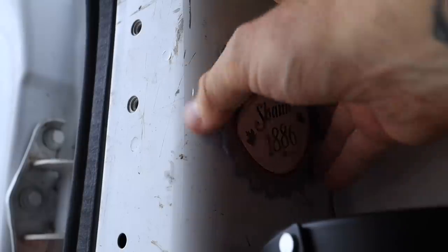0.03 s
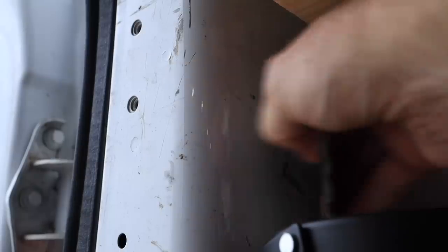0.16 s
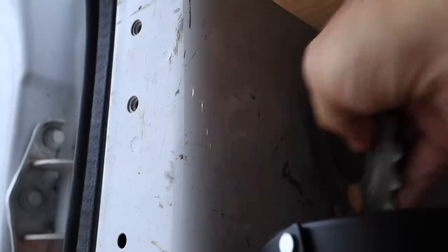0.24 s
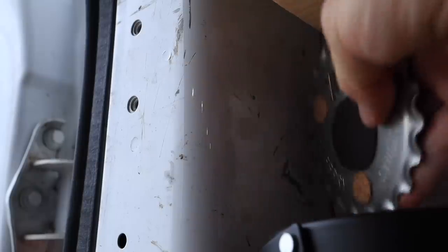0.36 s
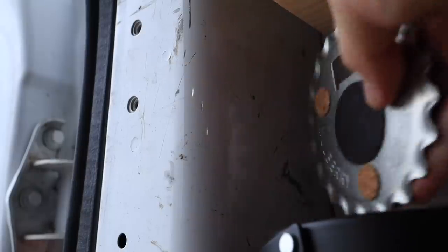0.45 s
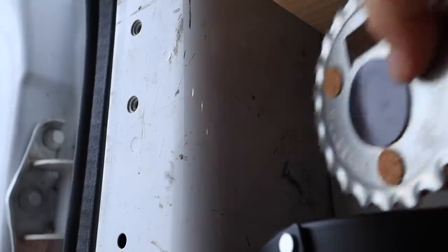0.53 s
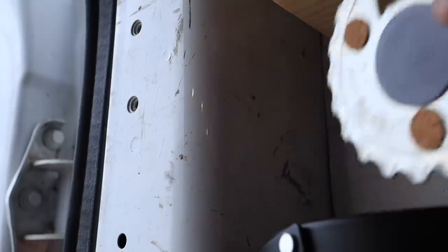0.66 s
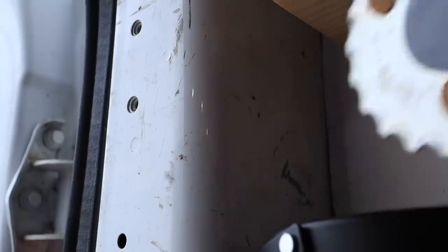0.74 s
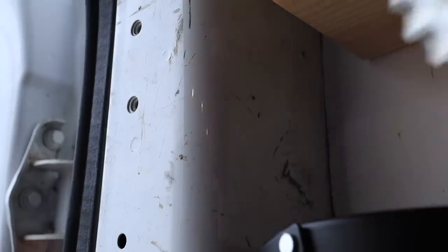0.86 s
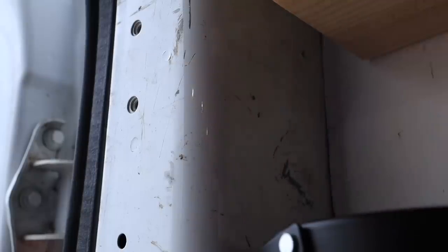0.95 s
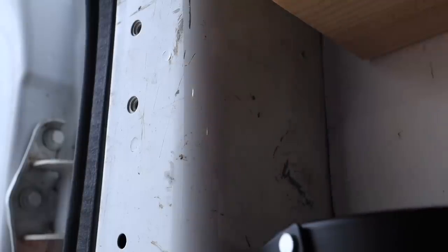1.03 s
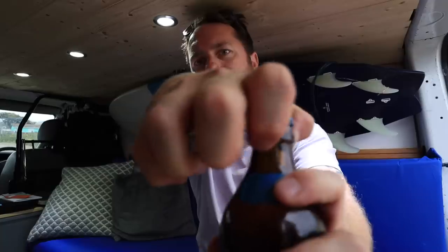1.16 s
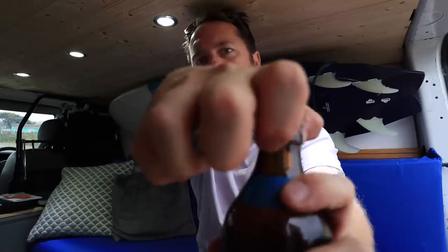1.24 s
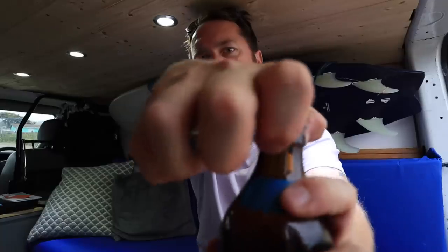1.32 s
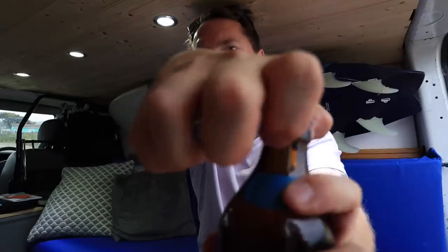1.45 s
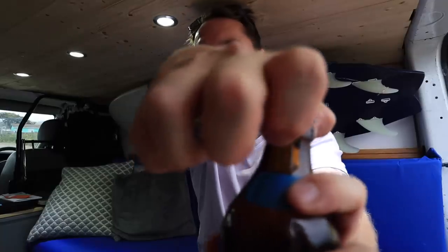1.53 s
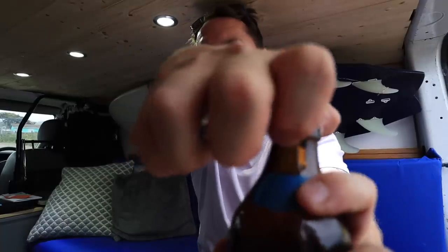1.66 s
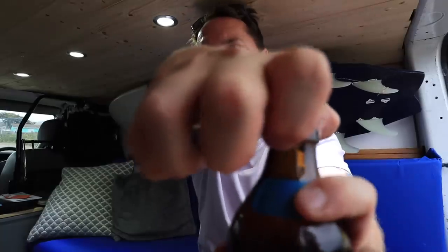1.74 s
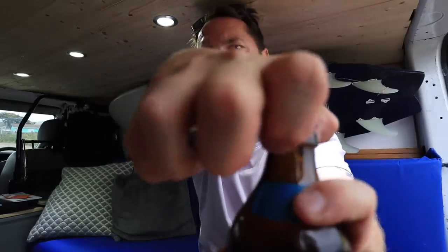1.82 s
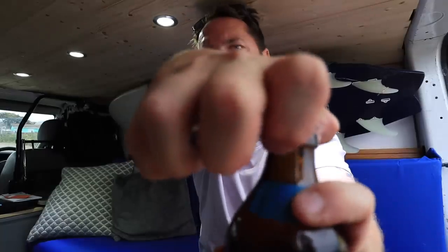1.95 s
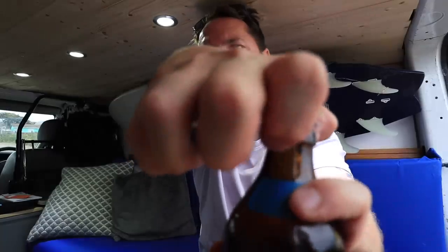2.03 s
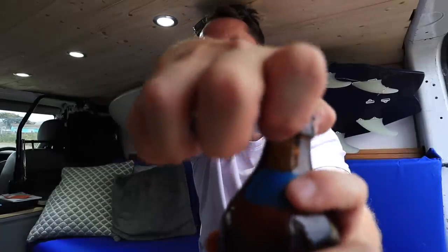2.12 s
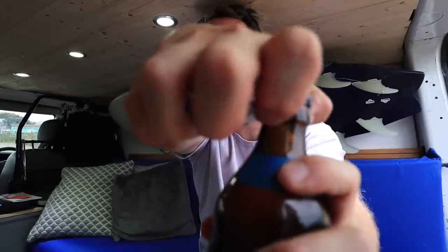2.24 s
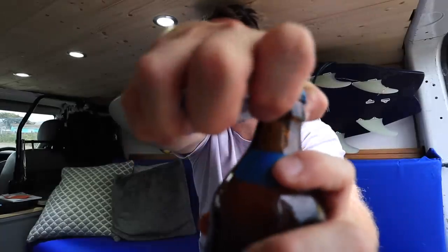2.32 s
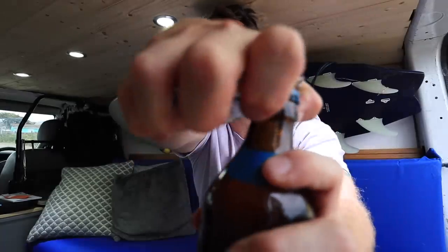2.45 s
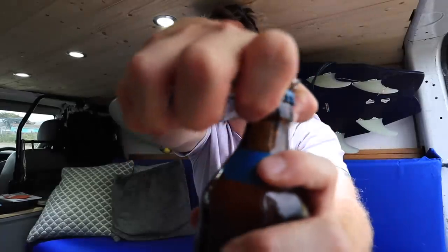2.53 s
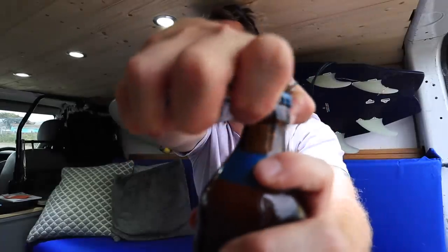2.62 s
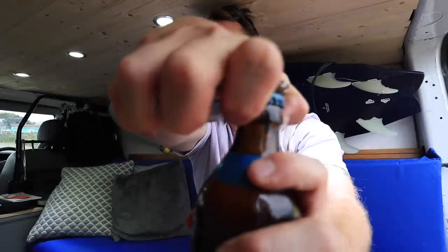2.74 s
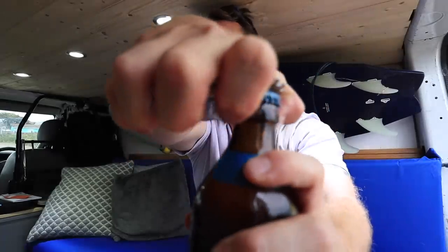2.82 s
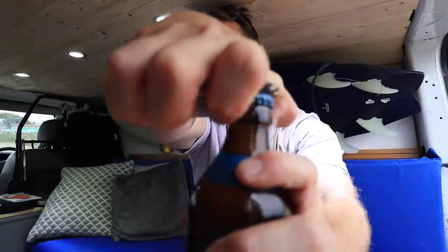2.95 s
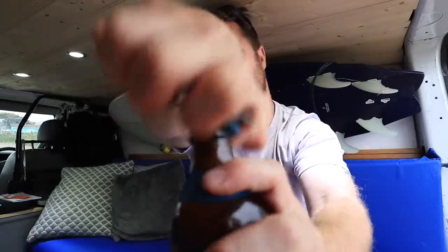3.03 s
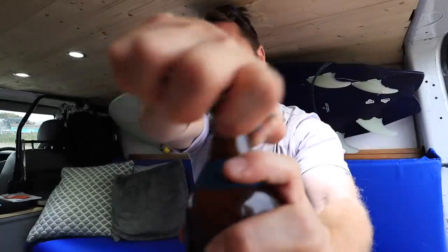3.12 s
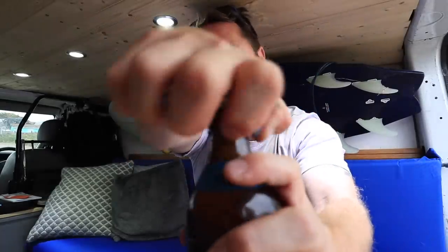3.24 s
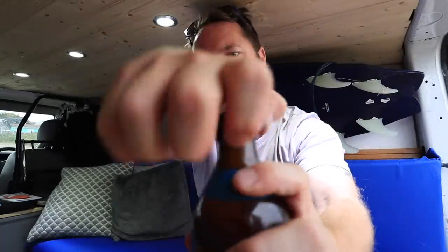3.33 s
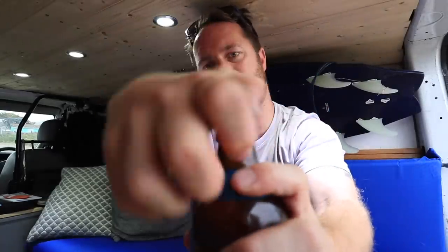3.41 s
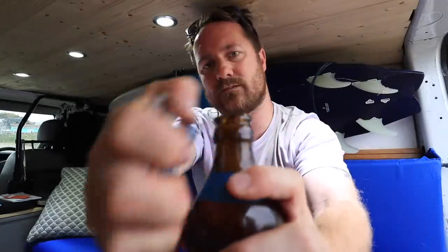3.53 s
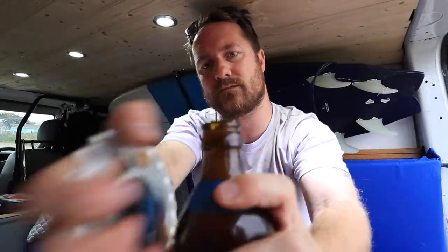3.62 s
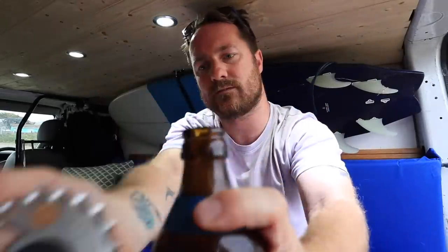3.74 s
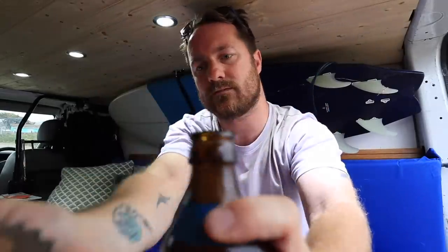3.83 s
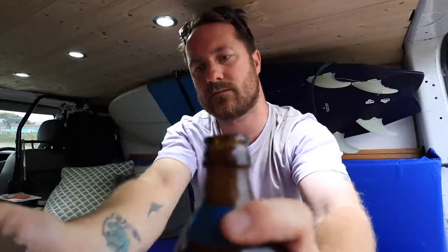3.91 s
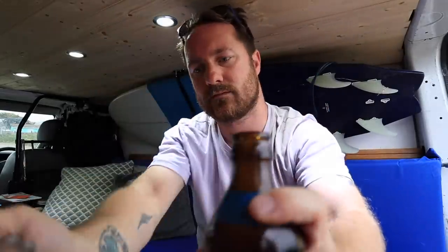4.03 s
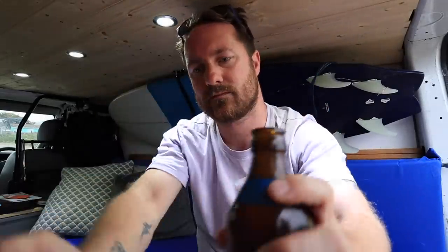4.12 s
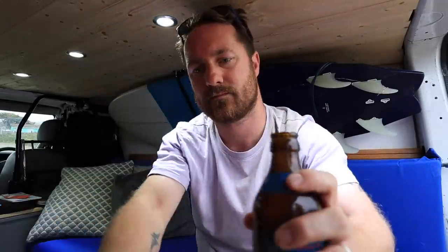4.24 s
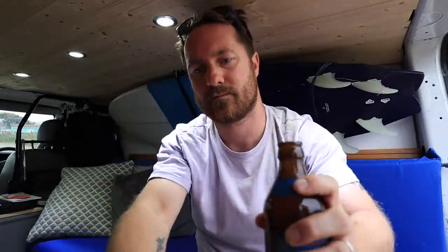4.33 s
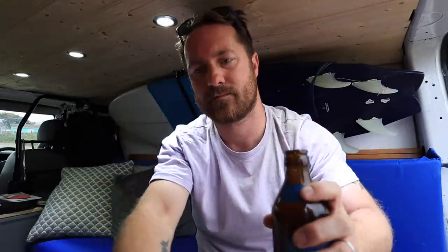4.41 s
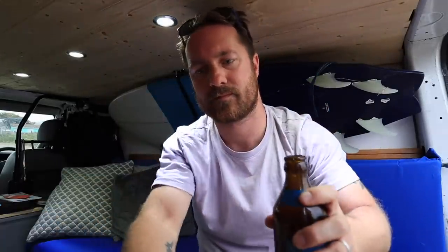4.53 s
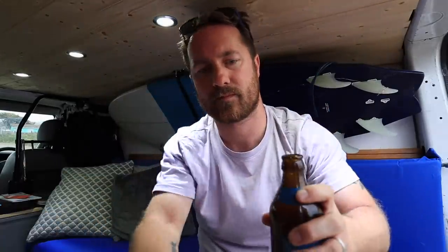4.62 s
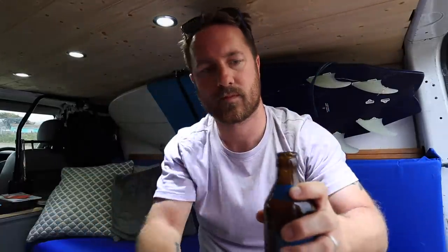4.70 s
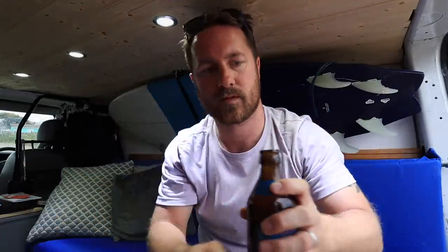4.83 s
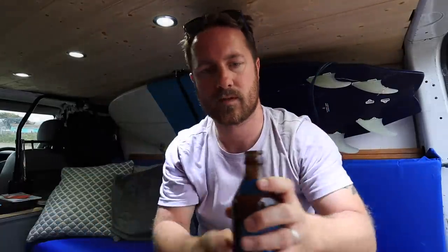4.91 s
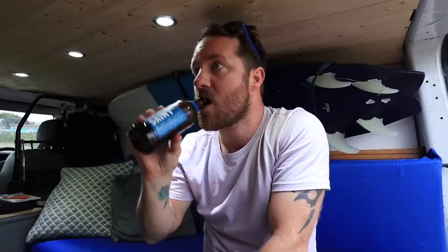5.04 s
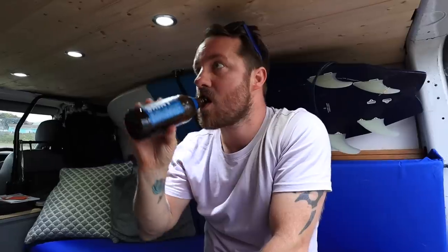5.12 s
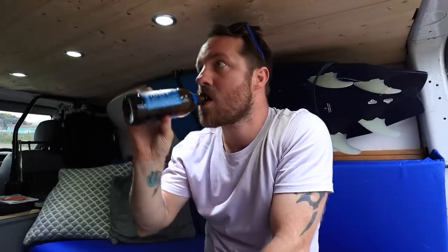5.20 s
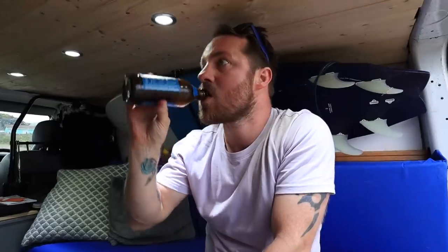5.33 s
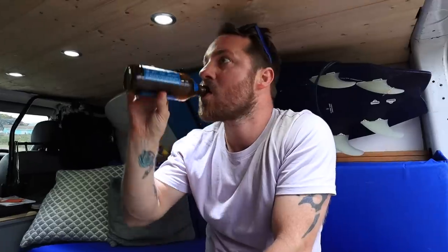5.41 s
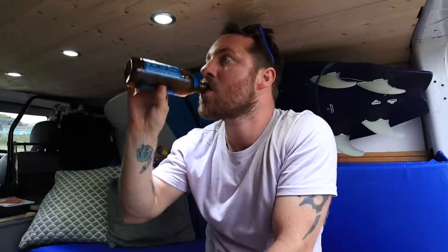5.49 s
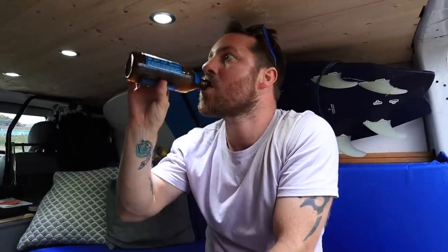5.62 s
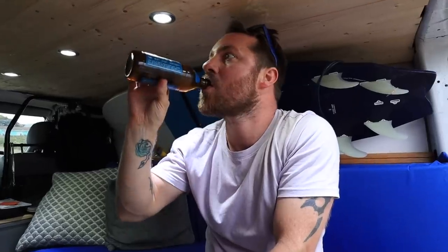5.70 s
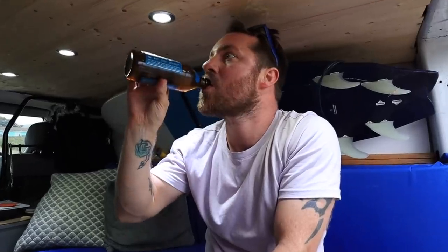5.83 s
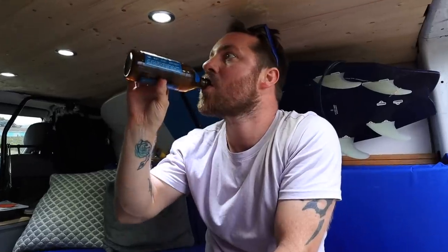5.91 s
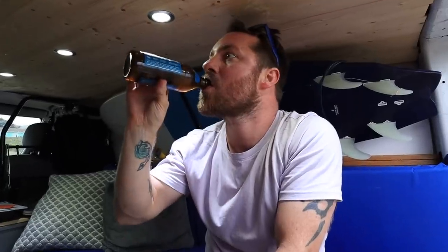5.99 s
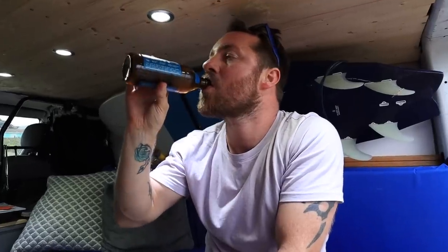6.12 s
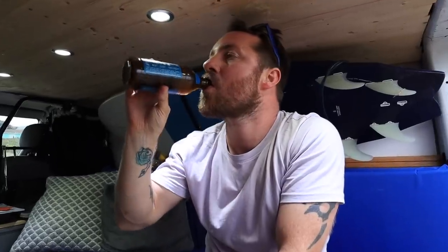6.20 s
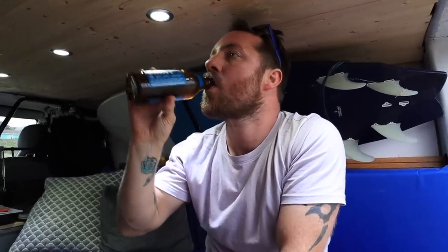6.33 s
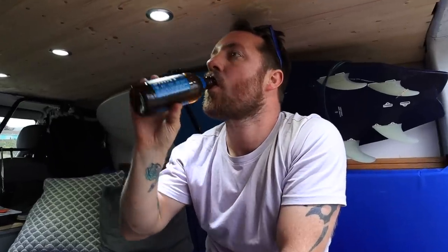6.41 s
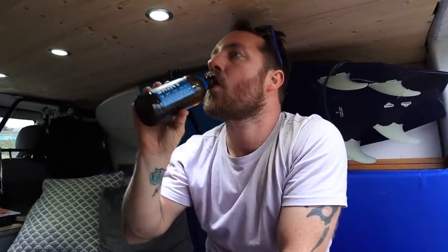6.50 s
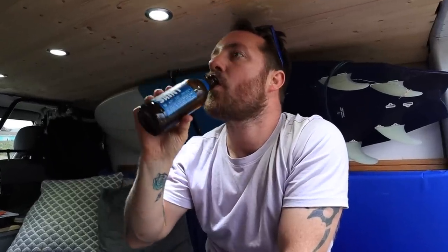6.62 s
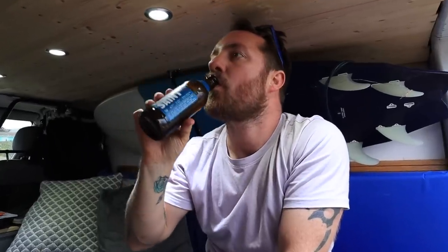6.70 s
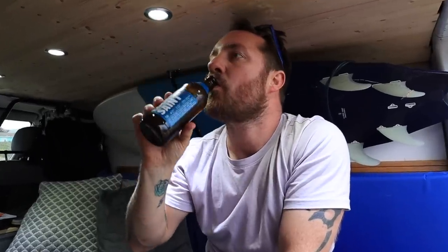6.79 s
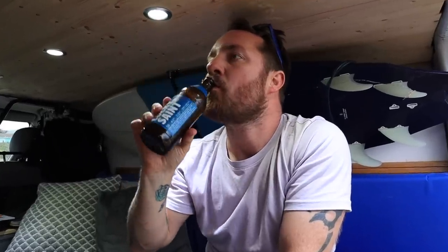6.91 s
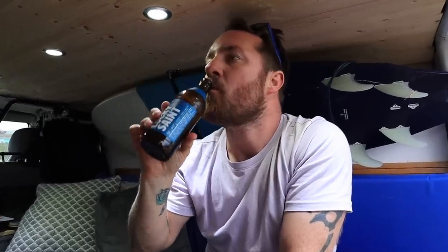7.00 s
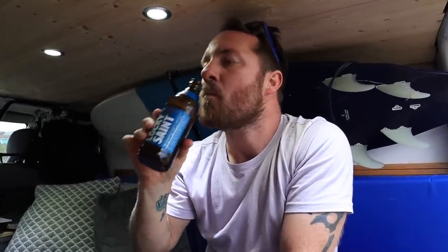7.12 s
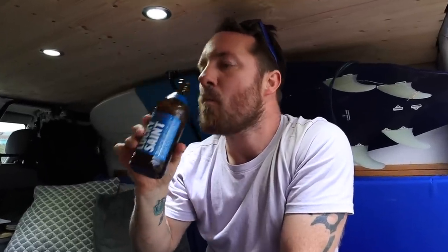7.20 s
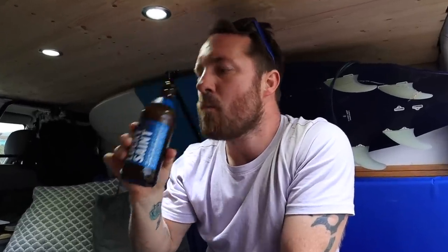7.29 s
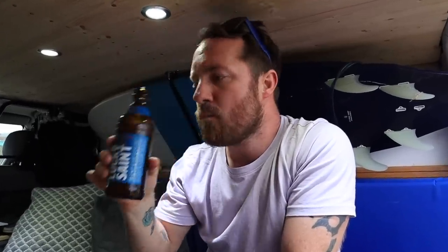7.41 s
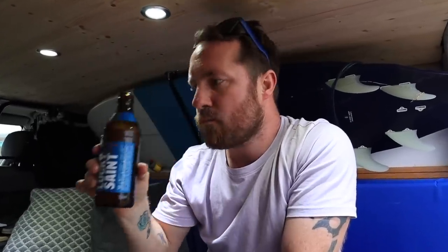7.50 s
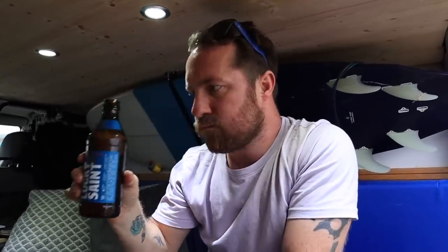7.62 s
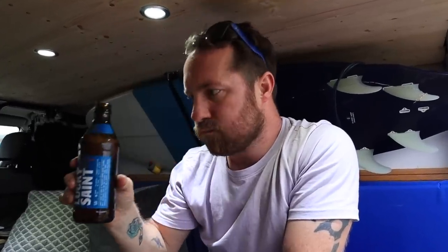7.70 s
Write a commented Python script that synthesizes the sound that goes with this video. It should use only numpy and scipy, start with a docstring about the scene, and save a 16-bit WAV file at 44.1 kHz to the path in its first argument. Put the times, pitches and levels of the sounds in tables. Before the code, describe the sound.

In a small, dry van interior with faint traffic rumble, a magnetic steel opener snaps off a thin metal wall with a hard clank, leaving soft low bumps. A very short bright gas hiss follows, then sharp clinks as the cap is prised. The cap bounces tinnily on wood, the heavier opener clatters after it and cuts off steeply, and faint glugs end the scene. Close microphone.

```python
"""Inside a panelled van a magnetic steel opener is pulled off a sheet-metal wall, which goes on shaking.
A crown cap is prised off a beer bottle: gas hisses, the cap clicks loose, drops and bounces on a wooden top,
the opener clatters down after it and fades out steeply; then air glugs into the tilted bottle.
Blows ring decaying modes over noise bursts; rubs and scrapes are random grains; gas and cabin are shaped noise."""
import sys
import numpy as np
from scipy import signal
from scipy.fft import rfft, irfft
from scipy.io import wavfile

SR = 44100
rng = np.random.default_rng(int(sys.argv[2]) if len(sys.argv) > 2 else 0)


def pcm_store(signal):
    """Save signal as 16-bit PCM."""
    levels = np.round(np.clip(np.atleast_2d(signal), -1, 1) * 32767)
    wavfile.write(sys.argv[1], SR, levels.astype(np.int16).T)


N = 341775


def amp(db):
    """Decibels to linear gain."""
    return 10 ** (np.asarray(db) / 20)


def rms_one(x):
    """Scale to rms 1."""
    return x / np.sqrt(np.mean(x ** 2) + 1e-30)


def band(x, low_hz, high_hz, order=2):
    """Butterworth band-pass."""
    edges_hz = [low_hz, min(high_hz, .45 * SR)]
    return signal.sosfilt(signal.butter(order, edges_hz, "band", fs=SR, output="sos"), x)


def gains(rows):
    """Gain over time of each dB column, silent outside the table."""
    time_s, *columns_db = np.transpose(rows)
    t = np.arange(N) / SR
    return [amp(np.interp(t, time_s, db, left=-200, right=-200)) for db in columns_db]


def swell(start_s, top_s, end_s, level_db, rise_db, fall_db):
    """Gain that rises to a top and falls again."""
    return gains([(start_s, level_db - rise_db), (top_s, level_db), (end_s, level_db - fall_db)])[0]


def clicks(start_s, level_db):
    """One-sample impulses over a negligible floor."""
    out = np.full(N, 1e-18)
    np.add.at(out, np.round(np.asarray(start_s) * SR).astype(int), amp(level_db))
    return out


def sounding(x, t60_s):
    """Stretch from the first click until the last has died away."""
    at = np.flatnonzero(abs(x) > 1e-15)
    return slice(at[0], at[-1] + int(2 * t60_s * SR) + SR // 20)


def ring(x, pitch_hz, t60_s):
    """One mode as a two-pole resonator: a unit click gives a decaying sine of initial height 1."""
    radius = amp(-60 / (t60_s * SR))
    angle = 2 * np.pi * pitch_hz / SR
    out, part = np.zeros(N), sounding(x, t60_s)
    poles = [1, -2 * radius * np.cos(angle), radius * radius]
    out[part] = signal.lfilter([0, np.sin(angle)], poles, x[part])
    return out


def strike(start_s, level_db, modes, spread_db):
    """Every blow sets each mode ringing with a strength of its own."""
    luck_db = spread_db * rng.standard_normal((len(start_s), len(modes)))
    out = np.zeros(N)
    for k, (pitch_hz, mode_db, t60_s) in enumerate(modes):
        blows = clicks(start_s, level_db + mode_db + luck_db[:, k])
        out += (-1) ** k * ring(blows, pitch_hz, t60_s)
    return out


def clank(start_s, level_db, low_hz, high_hz, t60_s, count=12):
    """Short modes scattered over a band; each blow picks out different ones."""
    pitches_hz = np.geomspace(low_hz, high_hz, count) * (1 + .03 * rng.standard_normal(count))
    luck_db = 5 * rng.standard_normal((len(start_s), count)) - 15
    out = np.zeros(N)
    for k, pitch_hz in enumerate(pitches_hz):
        out += (-1) ** k * ring(clicks(start_s, level_db + luck_db[:, k]), pitch_hz, t60_s)
    return out


def burst(start_s, level_db, low_hz, high_hz, t60_s):
    """The countless short modes of a contact: band noise that starts at once and dies."""
    x, noise, out = clicks(start_s, level_db), rng.standard_normal(N), np.zeros(N)
    part = sounding(x, t60_s)
    envelope = signal.lfilter([1], [1, -amp(-60 / (t60_s * SR))], x[part])
    level = np.sqrt(SR / 2 / (high_hz - low_hz))  # makes up for the narrow band
    out[part] = level * band(envelope * noise[part], low_hz, high_hz)
    return out


def snap(start_s, level_db, low_hz, high_hz, t60_s, tail_db):
    """A bright crack and its weaker, four times longer flutter between the near panels."""
    crack = burst(start_s, level_db, low_hz, high_hz, t60_s)
    return crack + burst(start_s, level_db + tail_db, low_hz, high_hz, 4 * t60_s)


def pings(start_s, level_db, pitch_hz, t60_s, rise_per_s=0):
    """Short rings whose pitch differs from blow to blow."""
    out, t = np.zeros(N), np.arange(SR // 8) / SR
    for s, db, hz in zip(start_s, level_db, pitch_hz):
        at = round(s * SR)
        phase = 2 * np.pi * hz * (t + rise_per_s * t ** 2 / 2)
        out[at:at + len(t)] += amp(db - 60 * t / t60_s) * np.sin(phase)
    return out


def choked(start_s, level_db, modes):
    """A heavy contact stops the running ring and starts a new one."""
    out, at = np.zeros(N), np.round(start_s * SR).astype(int)
    stops = np.append(at[1:], at[-1] + SR // 4)
    luck_db = rng.standard_normal((len(start_s), len(modes)))
    for start, stop, db, extra_db in zip(at, stops, level_db, luck_db):
        t = np.arange(stop - start) / SR
        for (pitch_hz, mode_db, t60_s), more_db in zip(modes, extra_db):
            decay = amp(db + mode_db + more_db - 60 * t / t60_s)
            out[start:stop] += decay * np.sin(2 * np.pi * pitch_hz * t)
    return out


def coloured(spectrum):
    """Noise of a given spectrum, rms 1."""
    pitch_hz, level_db = np.transpose(spectrum)
    log_hz = np.log(np.arange(N // 2 + 1) * SR / N + 1)
    shape = amp(np.interp(log_hz, np.log(pitch_hz), level_db))
    return rms_one(irfft(rfft(rng.standard_normal(N)) * shape, N))


def grains(per_s, spread_db):
    """Random tiny contacts of very uneven size."""
    born, out = rng.random(N) < per_s / SR, np.zeros(N)
    luck = rng.random((born.sum(), 2))
    size_db = spread_db * np.minimum(-np.log(1 - luck[:, 0]), 4)
    out[born] = amp(size_db) * np.sign(luck[:, 1] - .5)
    return out


# distant traffic: time_s, level_db
TRAFFIC = [(0, -52), (.6, -56), (1.1, -55.5), (1.13, -57), (2.3, -59.5), (4.8, -58.5), (5.8, -60.5),
           (7.75, -60)]
# cabin noise spectrum: pitch_hz, relative level_db per Hz
CABIN = [(12, -45.5), (20, -15), (53, -7), (98, -16.5), (145, -10), (181, -17.5), (307, -16), (334, -18.5),
         (466, -16.5), (521, -14), (633, -18), (885, -16.5), (989, -18), (1680, -17), (15600, -31.5)]
# thin tone: start_s, top_s, end_s, level_db, rise_db, fall_db
HUM = (1.24, -2.5, 4.5, -64.5, .6, 4.5)
HUM_HZ = 892.6
RUMBLE_DB, RUMBLE_FADE_DB_PER_S = 0.5, 1.07  # against the traffic
HISS_DB, HISS_FOLLOWS = 8.0, 1.26  # gain, exponent on the traffic gain


def cabin():
    """Distant traffic, rumble and microphone hiss as shaped noise bands; narrow noise makes a wavering tone."""
    edges_hz = [(15, 200), (200, 3000), (3000, 19000)]
    traffic, = gains(TRAFFIC)
    rumble = traffic * amp(RUMBLE_DB - RUMBLE_FADE_DB_PER_S * np.arange(N) / SR)
    levels = [rumble, traffic, amp(HISS_DB) * traffic ** HISS_FOLLOWS]
    parts = sum(gain * rms_one(band(coloured(CABIN), *hz)) for gain, hz in zip(levels, edges_hz))
    tone = rms_one(band(rng.standard_normal(N), HUM_HZ - 12, HUM_HZ + 12))
    return parts + swell(*HUM) * tone


VAN_T60_S, VAN_DB, VAN_CUT_HZ = 0.13, -18, 10000


def van(x):
    """Dense short reflections off panels and cushions, dulled: convolution with decaying noise."""
    t = np.arange(SR // 2) / SR
    tail = rng.standard_normal(len(t)) * amp(-60 * t / VAN_T60_S) * (t > .003)
    tail = band(tail, 120, VAN_CUT_HZ, order=1)
    return signal.fftconvolve(x, tail / np.sqrt(np.sum(tail ** 2)))[:N]


# faint ticks: start_s, snap_db, knock_db
TICKS = [(.95, -47, -62), (2.469, -62, -47), (2.582, -62, -54), (2.71, -48.5, -79.5), (4.9412, -57, -54.5),
         (5.1927, -45.5, -50.5), (5.743, -42.5, -65), (6.4977, -49, -59), (6.766, -60, -53.5),
         (7.687, -66, -57.5)]


def ticks():
    """Tiny dry contacts: bright and middle noise bursts."""
    start_s, snap_db, knock_db = np.transpose(TICKS)
    return burst(start_s, snap_db, 2700, 19400, 0.013) + burst(start_s, knock_db, 800, 3500, 0.22)


# hand meeting wood softly: start_s, level_db
PALM = [(3.862, -40.5), (3.876, -50), (3.897, -48)]


def palm():
    """Flesh gives only a dull low puff."""
    start_s, level_db = np.transpose(PALM)
    return burst(start_s, level_db, 110, 480, .08)


# hand shifting on glass: top_s, low_db, high_db
GRIP = [(2.35, -52, -71), (2.455, -62, -51.5), (2.525, -48.5, -49), (2.585, -56, -53), (2.63, -53, -73.5)]
RUB_DB_PER_S = 397.5  # swell and fade rate


def grip():
    """Skin creeping over glass and label in a few short rubs of filtered grains."""
    t, rub = np.arange(N) / SR, grains(600, spread_db=3.0)
    low, high = sum(amp(np.array(db)[:, None] - RUB_DB_PER_S * np.minimum(abs(t - top_s), 1))
                    for top_s, *db in GRIP)
    bright = band(rub, 1300, 2430) + 0.2 * band(rub, 2300, 5700)
    return low * rms_one(band(rub, 390, 930)) + high * rms_one(bright)


# loose fitting bumping on the shaking wall: start_s, thud_db, knock_db
BUMPS = [(.404, -43, -71), (.469, -44, -63), (.491, -46, -48.5), (.551, -36, -48), (.58, -34, -55),
         (.634, -52, -47), (.682, -35.5, -52.5), (0.742, -41.5, -51), (0.814, -37, -62), (.876, -41, -52),
         (.948, -45, -63), (1.04, -51, -64), (1.08, -51.5, -60)]
# fitting modes, three for the thud, then the knock: pitch_hz, level_db, t60_s
FITTING = [(165.6, 5.5, 0.098), (310, -11, 0.056), (504, -1, 0.038), (816, 15, 0.044), (1370, -4, 0.076)]
# rattle swells: start_s, top_s, end_s, level_db, rise_db, fall_db
RATTLES = [(0.228, 0.296, 0.37, -35, 14, 29), (.42, 0.57, 1.12, -51.5, 15, 5)]
SHUDDER_DB, SHUDDER_T60_S = -2, 0.27  # wall boom against each thud
RELEASE_S, RELEASE_BOOM_DB = .24, -29.5  # freed wall springs back


def bumps():
    """Soft low bumps, each leaving a shudder, over a rattle while the wall settles."""
    start_s, thud_db, knock_db = np.transpose(BUMPS)
    boom_s = np.append(start_s, RELEASE_S)
    boom_db = np.append(thud_db + SHUDDER_DB, RELEASE_BOOM_DB)
    shudder = burst(boom_s, boom_db, 71, 320, SHUDDER_T60_S)
    rattle = sum(swell(*row) for row in RATTLES) * rms_one(band(grains(680, spread_db=1.0), 240, 1440))
    knocks = strike(start_s, thud_db, FITTING[:3], spread_db=0)
    knocks += strike(start_s, knock_db, FITTING[3:], spread_db=3.0)
    return shudder + rattle + band(knocks, 96, 1700)


# faint low thud at the start, then the opener leaving the wall: start_s, snap_db, thud_db, knock_db, crack_db
PULL = [(.003, -70, -46, -64, -78), (0.1223, -21.5, -30.5, -24, -17), (.126, -26, -34, -25.5, -22),
        (.163, -54, -44, -55.5, -34), (.173, -40, -41.5, -54.5, -31.5), (.191, -48, -55.5, -52.5, -36),
        (.197, -33.5, -40.5, -21, -20), (0.2107, -27, -53, -32.5, -38), (.2145, -30, -21, -5, -8),
        (.231, -34, -20, -15.5, -30.5)]
# sheet-metal wall modes: pitch_hz, level_db, t60_s
WALL = [(384, 9, 0.078), (523.5, -13.5, 0.51), (935, 1, 0.075), (1102, -9.5, 0.095), (1435, -7, 0.19),
        (1867, -8, 0.15), (2270, -39, 0.52), (2620, -26, 0.25)]
# opener comes clear and rings: start_s, level_db
FREE = [(.2146, -14.5)]
# modes of the opener held in the fingers: pitch_hz, level_db, t60_s
HELD_OPENER = [(4802, -8, .19), (4899, -11, .12), (5507, -12, .08), (4107, -22, .2), (9650, -36, .2)]
BOOM_DB, KNOCK_TAIL_DB = -7, -10.5  # wall noise under thud and knock
CRACK_HZ, CRACK_NOISE_DB = 3480, -3.5  # short pitch of each crack, its noise
FREE_WASH_DB = -20  # bright noise against the freed ring


def pull():
    """After a faint low thud the magnets let go: snaps, the wall booms, the opener rings in the fingers."""
    start_s, snap_db, thud_db, knock_db, crack_db = np.transpose(PULL)
    cracks = snap(start_s, snap_db, 5000, 13000, 0.024, tail_db=-15)
    cracks += snap(start_s, crack_db + CRACK_NOISE_DB, 3200, 4100, 0.023, tail_db=-18.5)
    cracks += ring(clicks(start_s, crack_db), CRACK_HZ, .022)
    booms = burst(start_s, thud_db + BOOM_DB, 120, 870, 0.25)
    booms += strike(start_s, thud_db, WALL, spread_db=3.0)
    knocks = burst(start_s, knock_db + KNOCK_TAIL_DB, 1030, 3240, 0.14)
    knocks += clank(start_s, knock_db, 1094, 5600, 0.05)
    free_s, free_db = np.transpose(FREE)
    freed = strike(free_s, free_db, HELD_OPENER, spread_db=3.0)
    freed += burst(free_s, free_db + FREE_WASH_DB, 3000, 14000, 0.27)
    return cracks + booms + knocks + freed


# air bubbles entering the bottle: start_s, level_db, pitch_hz
GLUGS = [(5.434, -49, 254.6), (5.528, -30.5, 227), (5.7, -39.5, 242.5), (5.939, -36.5, 219.4),
         (6.157, -37, 224.6), (6.518, -46, 283), (7.311, -37.5, 262), (7.682, -46, 226)]
GLUG_TAIL_DB = -65.5


def glugs():
    """A bubble pinches off with a few cycles; its faint tail rises in pitch as it nears the surface."""
    out, t = np.zeros(N), np.arange(SR // 4) / SR
    for start_s, level_db, pitch_hz in GLUGS:
        envelope = (t / 0.0048) ** 2 * np.exp(2 - 2 * t / 0.0047)
        pop = amp(level_db) * envelope * np.sin(2 * np.pi * pitch_hz * t)
        rising = np.sin(2 * np.pi * pitch_hz * (.68 * t + 7 * t ** 3))
        tail = amp(GLUG_TAIL_DB) * (t / .045) * np.exp(1 - t / .045) * rising
        at = round(start_s * SR)
        out[at:at + len(t)] += (pop + tail)[:N - at]
    return out


# gas past the lifted cap: time_s, level_db
HISS = [(1.67, -78), (1.728, -44.5), (1.756, -48), (1.79, -26.5), (1.826, -21), (1.844, -23.5), (1.9, -71)]
# jet noise spectrum: pitch_hz, relative level_db per Hz
JET = [(590, -41), (1000, -24), (1480, -26), (2030, -13), (2250, -20.5), (5070, -8.5), (5310, -8.5),
       (9720, -4.5), (10200, -5), (14100, 1), (16000, -11.5)]
# edge whistles: pitch_hz, width_hz, level_db against the jet
WHISTLES = [(5290, 45, -25), (7700, 48, -19), (10270, 220, -13), (12380, 150, -8)]
NECK_DB = -34  # neck turbulence against the jet


def hiss():
    """Smooth bright jet noise; narrow bands of it make faint edge whistles and neck turbulence."""
    noise = coloured(JET)
    tones = sum(amp(level_db) * rms_one(band(noise, pitch_hz - width_hz / 2, pitch_hz + width_hz / 2))
                for pitch_hz, width_hz, level_db in WHISTLES)
    neck = amp(NECK_DB) * rms_one(band(noise, 1900, 2140))
    return gains(HISS)[0] * (noise + tones + neck)


# opener teeth working the cap: start_s, snap_db, clamped cap_db, cap_hz, neck air neck_db, neck_hz
PRY = [(3.0653, -40, -42.5, 6600, -26, 940), (3.1107, -38, -27.5, 6100, -41.5, 860),
       (3.1134, -7, -26, 6020, -26, 1000), (3.1407, -30, -31, 6380, -20.5, 1130),
       (3.212, -46, -57, 5760, -59, 1060), (3.2175, -39, -38, 5650, -44.5, 930),
       (3.241, -35, -34, 5350, -31.5, 1105), (3.274, -31, -33.5, 5740, -52, 940),
       (3.3048, -30.5, -43, 5800, -43, 877), (3.3867, -54, -60, 4970, -60, 802),
       (3.424, -53, -60, 6230, -47, 1080), (3.433, -51, -45, 6900, -39, 1000),
       (3.454, -58, -47, 5800, -49.5, 1010), (3.468, -45, -48, 5560, -39, 1025),
       (3.5046, -48, -53, 5140, -50, 860), (3.5336, -33, -41, 6000, -49, 830)]
PRY_KNOCK_DB, PRY_KNOCK_FOLLOWS = -12, 0.61  # offset, share of cap_db
PRY_TAIL_DB, NECK_PUFF_DB = -7.5, -16.5  # noise under knock and neck ring
NECK_RISE_PER_S = 1.8  # relative pitch climb in each ring


def pry():
    """The clamped cap gives short dull clinks; the air in the neck answers, its pitch climbing in each ring."""
    start_s, snap_db, cap_db, cap_hz, neck_db, neck_hz = np.transpose(PRY)
    knock_db = PRY_KNOCK_DB + PRY_KNOCK_FOLLOWS * cap_db
    cracks = snap(start_s, snap_db, 7180, 12500, 0.017, tail_db=-15.5)
    cracks += clank(start_s, snap_db, 7000, 13000, 0.0306, count=8)
    knocks = burst(start_s, knock_db + PRY_TAIL_DB, 1550, 5060, 0.052)
    knocks += clank(start_s, knock_db, 1860, 4800, 0.0138, count=8)
    clinks = burst(start_s, cap_db, 5000, 6030, .05) + pings(start_s, cap_db, cap_hz, 0.0551)
    neck = pings(start_s, neck_db, neck_hz, 0.045, NECK_RISE_PER_S)
    neck += burst(start_s, neck_db + NECK_PUFF_DB, 644, 1375, 0.062)
    return cracks + knocks + clinks + neck


# skirt dragging over glass, then wood: start_s, top_s, end_s, level_db, rise_db, fall_db
SCRAPES = [(3.402, 3.543, 3.64, -51, 21, 13.5), (4.443, 4.452, 4.495, -38, 12, 24)]
# cap crown modes: pitch_hz, level_db, t60_s
CROWN = [(5860, 4.5, 0.061), (5624, -6.5, 0.0539), (10170, -12, 0.088)]


def scrape():
    """Crimped tin stutters along: uneven tiny contacts in a middle band and on the crown mode."""
    touches = grains(1100, spread_db=4.5)
    crown = rms_one(ring(touches, CROWN[0][0], 0.025))
    tin = rms_one(band(touches, 2525, 4800)) + 0.61 * crown
    return sum(swell(*row) for row in SCRAPES) * tin


# loose cap touching opener or wood: start_s, snap_db, thud_db, knock_db, crown_db, skirt_db, dish_db
CAP_HITS = [(3.3013, -48, -62, -53, -32.5, -34, -67), (3.5437, -30, -57, -37, -30, -45, -61.5),
            (3.564, -26, -78, -52, -36, -35, -60), (3.5834, -33, -71, -34.5, -42, -24.5, -60),
            (3.6244, -37, -52.5, -54, -43, -58, -59), (3.6927, -21.5, -42.5, -13, -21, -27, -44),
            (3.766, -21, -51, -53, -17, -16, -46), (3.9255, -24.5, -17.5, -25, -25, -32, -39),
            (4.1282, -7.5, -30, -16.5, -10, -29, -41.5), (4.231, -71, -56, -70, -81, -74, -89.5),
            (4.267, -51.5, -71, -66.5, -73, -68, -80), (4.3, -32.5, -23, -32.5, -37, -33, -46),
            (4.363, -67, -27.5, -36, -40.5, -36, -54), (4.4213, -71, -34.5, -42, -59, -68, -78.5),
            (4.4427, -67, -44.5, -49, -45.5, -61, -59.5), (4.4545, -63, -42, -26, -34.5, -62, -54.5),
            (4.576, -49, -30.5, -14.5, -18, -25.5, -50), (4.658, -27, -39, -18.5, -28.5, -41, -45)]
# cap skirt modes: pitch_hz, level_db, t60_s
SKIRT = [(7890, -0.5, 0.057), (7420, -27.5, 0.092)]
# cap rim modes: pitch_hz, level_db, t60_s
RIM = [(14020, 0, .07), (14390, -4, .08), (15500, -2, .08), (13050, -9, .06)]
# cap dish modes: pitch_hz, level_db, t60_s
DISH = [(2482, 2, .28), (2450, -7, .15), (2105, -5, .22)]
# dish overtones: pitch_hz, level_db, t60_s
DISH_TOP = [(4650, -4, .16), (4705, -11, .12)]
# wooden top modes, also under the opener: pitch_hz, level_db, t60_s
WOOD = [(232.5, -7, 0.11), (296.6, -4, 0.0863), (419, -1, 0.11), (699.6, -10.5, 0.075), (999, -3.5, 0.064),
        (1225, 0, 0.043), (1498, -7.5, 0.073)]
RIM_DB, DISH_TOP_DB = 10.5, 8.5  # against dish_db
CAP_CRACK_DB, CAP_WOOD_DB = -4.5, -5.5  # crack against knock, wood ring against thud


def cap():
    """Each touch of the loose cap rings its mode families at separate strengths."""
    start_s, snap_db, thud_db, knock_db, crown_db, skirt_db, dish_db = np.transpose(CAP_HITS)
    cracks = snap(start_s, snap_db, 4200, 10000, 0.01, tail_db=-10.5)
    cracks += snap(start_s, knock_db + CAP_CRACK_DB, 2300, 6000, 0.024, tail_db=-11)
    rings = strike(start_s, crown_db, CROWN, spread_db=0.5)
    rings += strike(start_s, skirt_db, SKIRT, spread_db=2.5)
    rings += strike(start_s, dish_db + RIM_DB, RIM, spread_db=3.0)
    rings += strike(start_s, dish_db, DISH, spread_db=1.5)
    rings += strike(start_s, dish_db + DISH_TOP_DB, DISH_TOP, spread_db=1.5)
    thuds = strike(start_s, thud_db + CAP_WOOD_DB, WOOD, spread_db=2.0)
    thuds += burst(start_s, thud_db, 300, 1099, 0.054)
    return cracks + clank(start_s, knock_db, 2300, 5600, .03, count=7) + rings + thuds


# opener landing and rocking on wood: start_s, thud_db, knock_db, ring_db, top_db
DROPS = [(4.4942, -25, -40, -28.5, -37), (4.537, -29, -36.5, -40, -50.5),
         (4.5501, -23.5, -27, -38.5, -51.5), (4.585, -36, -28.5, -44.5, -53.5),
         (4.6311, -13, -10, -34, -19.5), (4.6364, -33.5, -11.5, -31, -38.5),
         (4.6674, -51, -25.5, -34, -39.5), (4.7095, -16, -16, -33, -34.5), (4.7154, -35.5, -7, -27.5, -19),
         (4.729, -36, -15, -34, -31.5), (4.7454, -51, -18, -41, -39.5), (4.7623, -30, -17.5, -56, -41),
         (4.7684, -20.5, -7, -39, -29), (4.7807, -53, -21, -37, -30.5), (4.7936, -35, -43, -39, -29),
         (4.8042, -25, -17, -29.5, -48), (4.8214, -29.5, -16.5, -38, -54)]
# opener lower modes: pitch_hz, level_db, t60_s
OPENER = [(2213, 10.5, 0.33), (2340, -15, .12), (2700, -9, 0.17), (3018, -2, 0.051)]
# opener upper modes: pitch_hz, level_db, t60_s
OPENER_TOP = [(6370, 9, 0.044), (6600, 2.5, .05), (4395, -6, 0.27), (5300, 0.5, 0.07), (7660, -7.5, 0.073),
              (9240, -6, 0.0676), (9500, -10.5, 0.2), (12200, -16.5, .1)]
# chatter on wood: start_s, top_s, end_s, level_db, rise_db, fall_db
WOOD_CHATTER = (4.432, 4.82, 4.9, -31.5, 7.5, 6.0)
# steel chatter, top after end so it climbs until it stops: start_s, top_s, end_s, level_db, rise_db, fall_db
STEEL_CHATTER = (4.5, 5, 4.9, -30, 27, 26)
DROP_SNAP_DB, DROP_SNAP_FOLLOWS = -1.5, 1.67  # harder knocks are brighter: offset, factor on knock_db
DROP_TAIL_DB, THUMP_DB = -16, -0.2  # noise under knock and thud
FADE_START_S, FADE_DB_PER_S = 4.84, 717  # the whole opener clatter fades out steeply within 0.1 s


def opener():
    """The heavy steel disc thumps the wood, rings and chatters on its teeth, then fades out steeply."""
    start_s, thud_db, knock_db, ring_db, top_db = np.transpose(DROPS)
    snap_db = DROP_SNAP_DB + DROP_SNAP_FOLLOWS * knock_db
    cracks = snap(start_s, snap_db, 6000, 16000, 0.011, tail_db=-30.5)
    cracks += burst(start_s, knock_db + DROP_TAIL_DB, 1400, 7000, 0.13)
    cracks += clank(start_s, knock_db, 1703, 8500, 0.043)
    rings = choked(start_s, ring_db, OPENER) + strike(start_s, top_db, OPENER_TOP, spread_db=3.0)
    thumps = strike(start_s, thud_db, WOOD, spread_db=2.0)
    thumps += burst(start_s, thud_db + THUMP_DB, 210, 1270, 0.064)
    fade = amp(-FADE_DB_PER_S * np.clip(np.arange(N) / SR - FADE_START_S, 0, .1))
    steel_gain = swell(*STEEL_CHATTER)
    audible = fade * steel_gain > 1e-5
    teeth = np.zeros(N)
    for pitch_hz, level_db, t60_s in OPENER[2:] + OPENER_TOP[:6] + CROWN[:1] + SKIRT[:1]:
        contacts = grains(200, spread_db=3) * audible
        teeth += amp(level_db) * ring(contacts, pitch_hz, t60_s / 2)  # half the free decay
    chatter = swell(*WOOD_CHATTER) * rms_one(band(grains(1200, spread_db=3), 280, 2200))
    chatter += steel_gain * teeth / np.std(teeth[teeth != 0])
    return fade * (cracks + rings + thumps + chatter)


def scene():
    """Near sources with their reflections, over the cabin background."""
    near = pull() + bumps() + pry() + scrape() + cap() + opener()
    near += hiss() + grip() + palm() + glugs() + ticks()
    near = band(near, 76.82, 11000)  # small things radiate no deep bass
    return (near + amp(VAN_DB) * van(near) + cabin())[None]


CUTOFF_HZ = 16800


def record(dry):
    """Peaks are rounded, the top is cut."""
    rounded = .95 * np.tanh(dry / .95)
    return signal.sosfilt(signal.cheby2(16, 80, CUTOFF_HZ, fs=SR, output="sos"), rounded)


dry = scene()
out = record(dry)
pcm_store(out)
```